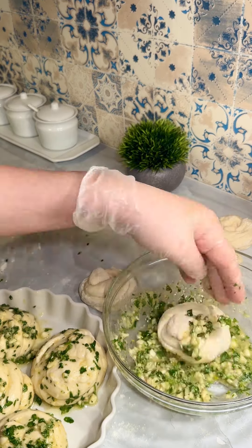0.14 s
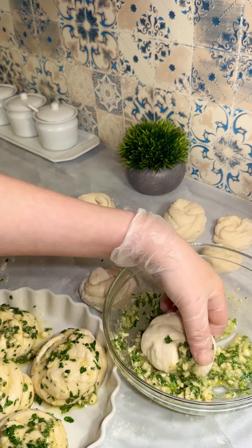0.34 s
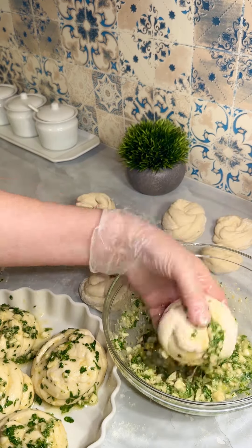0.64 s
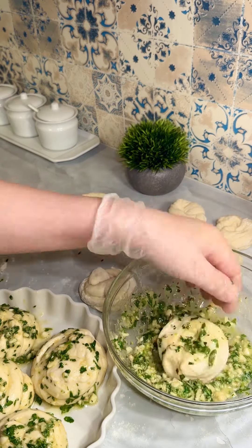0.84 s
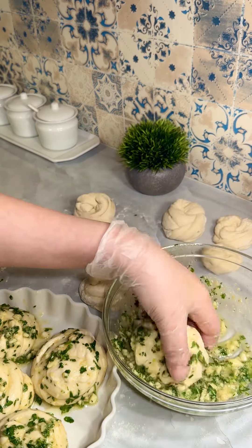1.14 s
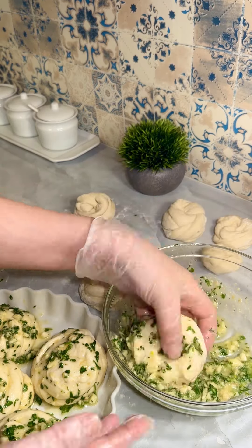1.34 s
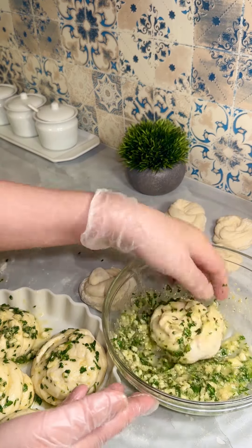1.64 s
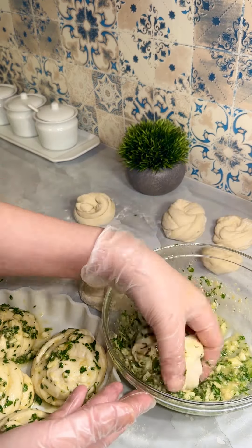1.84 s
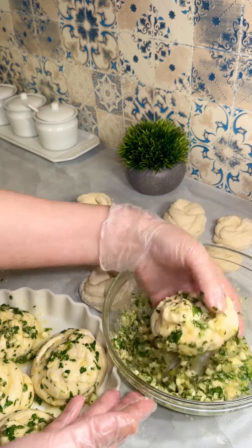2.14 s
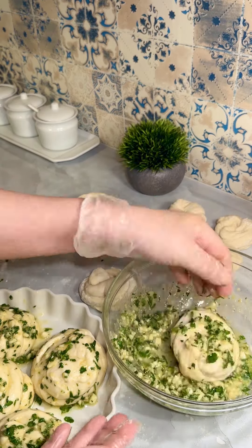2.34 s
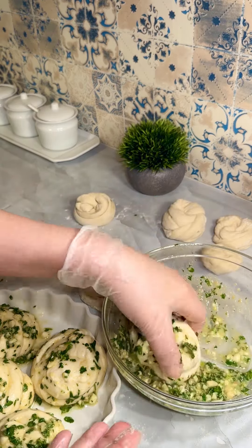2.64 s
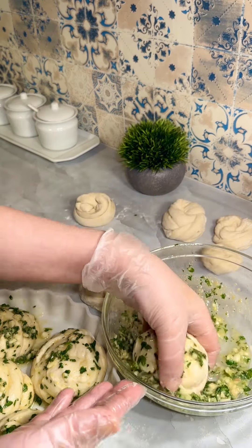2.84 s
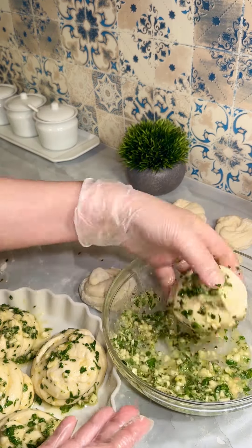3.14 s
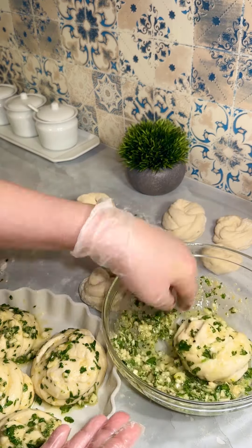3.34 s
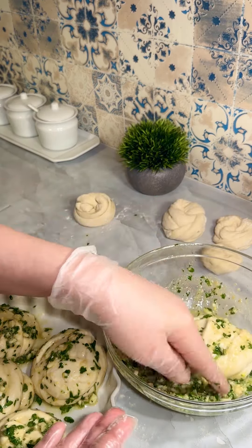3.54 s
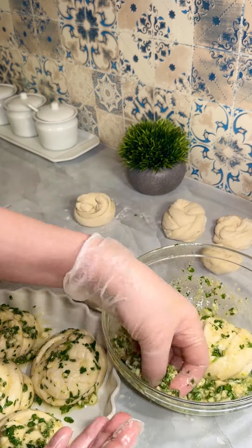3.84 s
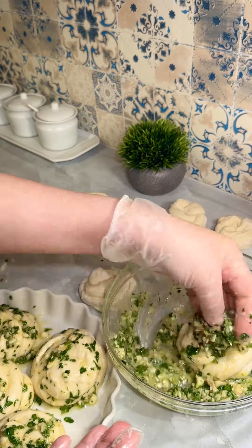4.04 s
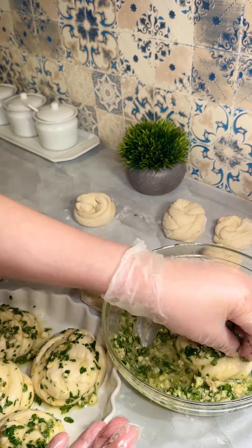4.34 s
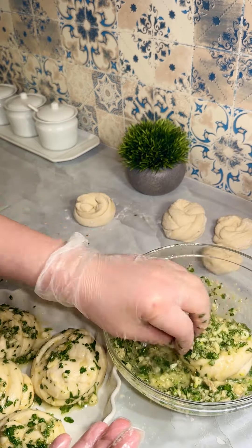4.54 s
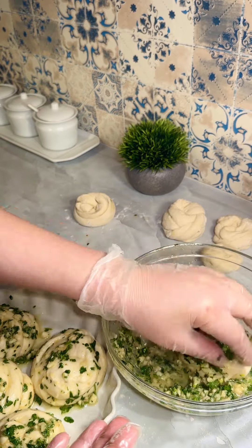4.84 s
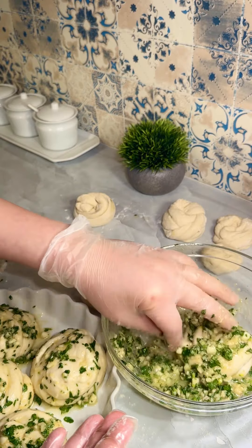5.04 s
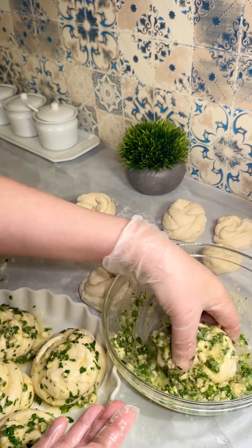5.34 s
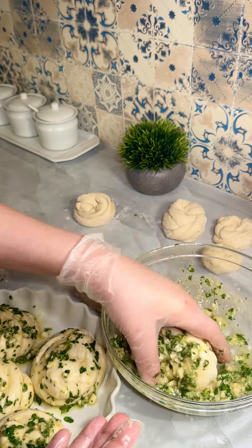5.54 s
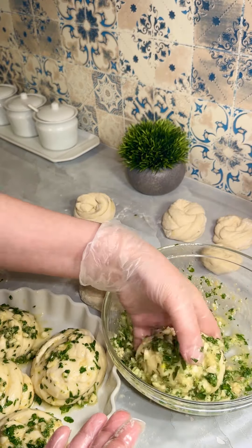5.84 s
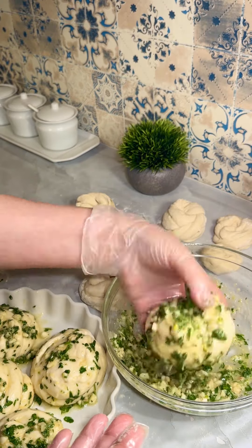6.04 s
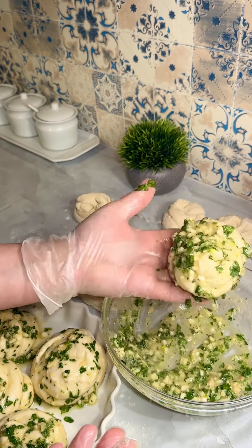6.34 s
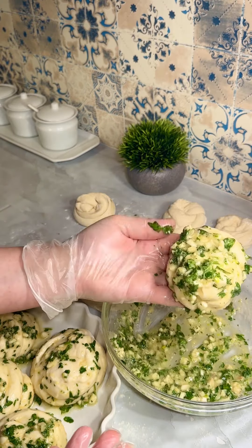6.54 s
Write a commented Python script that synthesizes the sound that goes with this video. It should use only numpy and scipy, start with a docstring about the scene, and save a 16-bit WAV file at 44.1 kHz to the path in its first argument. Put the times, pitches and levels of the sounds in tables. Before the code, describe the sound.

Dough squelches as a gloved hand turns it through chopped herbs and butter in a glass bowl, heard from close by in a kitchen with a low appliance hum. Soft thuds, small air pops, sticky smacks and two brief squirts come irregularly, while a faint far motor swells, later rises in pitch and fades. The hand eases off, presses out another strong plop and finishes with gentle rustling and oily clicks.

```python
"""A kitchen counter, microphone close to a glass bowl: a gloved hand kneads dough in oily herb butter.
From the start an appliance hums, herbs rustle, butter crackles and each push thuds the bowl dully.
Soon trapped air plops out and the dough leaves the glove with wet smacks; twice, air squirts through
a buttery gap. At two seconds a far motor swells, later climbing in pitch and fading. The hand eases
off, presses out one more strong plop at five seconds, and ends on light strokes and snaps of oil."""
import sys
import numpy as np
from scipy import signal
from scipy.fft import rfft, irfft, next_fast_len
from scipy.io import wavfile
from scipy.ndimage import uniform_filter1d, map_coordinates

SR = 44100
rng = np.random.default_rng(int(sys.argv[2]) if len(sys.argv) > 2 else 0)


def log_audio(samples):
    """Write samples as a 16-bit WAV file to the path given in sys.argv[1]."""
    # one column per channel
    frames = np.atleast_2d(samples).T
    # limit to full scale, then quantise
    limited = np.clip(frames, -1, 1)
    pcm = np.round(limited * 32767).astype(np.int16)
    wavfile.write(sys.argv[1], SR, pcm)


N = 295911
TIME = np.arange(N) / SR
CUTOFF_HZ = 16200

# The far motor. Each row: time in seconds, pitch in Hz, level in dB.
FAR_MOTOR = [(0, 42.9, -85), (2.0, 52, -75), (2.09, 58.53, -58.5), (3.45, 58.3, -58), (3.7, 52.8, -67.5),
             (3.95, 57.26, -59.5), (4.31, 58, -57.5), (4.39, 72.6, -73), (4.75, 80, -62.5), (4.92, 79, -86),
             (5.8, 75.7, -74), (6.71, 72.75, -74)]
# The appliance in the room. Each row: frequency in Hz, rms level in dB.
APPLIANCE_HUM = [(193.8, -60), (646, -84.5)]
# The kitchen's tail. Each row: frequency in Hz, seconds to fall by 60 dB.
KITCHEN_DECAY = [(200, 0.17), (700, 0.16), (2000, 0.15), (6000, 0.078), (12000, 0.029), (16000, .18)]
# Width of diffuse sound at the microphone. Each row: frequency in Hz, side against mid in dB.
STEREO_WIDTH = [(100, -19.5), (220, -12.5), (400, -8), (700, 2), (1300, 9.5), (2400, -1.5), (4400, -2.5),
                (8000, -10), (15000, -1)]
# The bowl sits a little to the left. Each row: frequency in Hz, left minus right in dB.
BOWL_BALANCE = [(200, 1.1), (700, 1), (1200, 5.5), (2500, -1), (5500, 4), (9000, 0), (13000, 1)]

# Tone of each noise at the microphone. Each row: frequency in Hz, relative gain in dB.
RUMBLE_SPECTRUM = [(30, -27), (70, -6.5), (105, 1.5), (140, 4.5), (210, 4.5), (260, -12), (400, -14.5),
                   (560, -14), (680, -19), (850, -26.5), (1500, -32.5), (4000, -39.5), (10000, -28),
                   (16000, -47.5)]
WHIRR_SPECTRUM = [(30, -26), (80, 0), (140, 2), (250, -10.5), (560, -20.5), (645, -12.5), (740, -54),
                  (2000, -48)]
RUSTLE_SPECTRUM = [(600, -24), (1500, -8.5), (2300, 0.5), (4000, 4.5), (6500, 2.5), (9000, -15),
                   (16000, -48)]
FIZZ_SPECTRUM = [(3000, -57.5), (6000, -7.5), (8000, 1), (11000, 5), (13000, -2), (16000, -12.5)]
SLIDE_SPECTRUM = [(30, -39), (100, -17.5), (350, 9.5), (700, 1.5), (1300, -10.5), (2000, -12.5),
                  (2600, -8.5), (3200, -9.5), (4000, -11.5), (6000, -39.5)]
SMEAR_SPECTRUM = [(30, -19), (70, 5.5), (170, 6.5), (400, 3.5), (800, -9.5), (1600, -15), (4000, -20),
                  (10000, -26.5), (16000, -36)]
SQUIRT_SPECTRUM = [(60, -30.5), (300, -2.5), (700, 1), (2000, -1.5), (3500, -3), (6000, -2), (9000, 4.5),
                   (14000, -0.5), (16000, -14)]
SMACK_SPECTRUM = [(60, -24), (250, -76), (450, 6.5), (900, 1), (1400, -8), (2400, 4.5), (3600, 0),
                  (6500, -0.5), (10000, 4), (13000, -2), (16000, -19.5)]

# The hand strokes through the chopped herbs.
# Each row: start and length in seconds, relative rustle level in dB, oily fizz against rustle in dB.
HAND_STROKES = [(0.053, .07, -69.5, 0), (0.233, 0.15, -63, 0), (0.447, .09, -70.5, -3),
                (0.558, 0.088, -68.5, 3), (0.732, 0.089, -72, 6), (0.977, 0.19, -70, -2.5),
                (1.181, 0.47, -71.5, 4), (1.665, .05, -64, 1), (1.727, .23, -70, -1.5),
                (2.016, 0.067, -68.5, 8.5), (2.203, 0.23, -72, 0), (2.478, 0.21, -74, 2),
                (2.769, 0.098, -68.5, 1), (2.906, 0.064, -73, -18), (3.136, 0.097, -74.5, 3),
                (3.326, 0.21, -74.5, 6), (3.581, 0.15, -76, 2.5), (3.813, .06, -74, -2),
                (4.033, 0.24, -81, 2), (4.421, 0.14, -79, 3), (4.623, .15, -83, 2), (4.98, 0.032, -74, 11),
                (5.152, 0.25, -73, -3.5), (5.412, 0.21, -71.5, 2.5), (5.683, 0.06, -73, 4),
                (5.843, 0.35, -76.5, -8), (6.502, 0.18, -77.5, 0)]
# Faint rustle between strokes. Each row: time in seconds, relative level in dB.
RUSTLE_FLOOR = [(0, -78), (1.95, -79), (2.15, -88), (3.8, -82), (4.3, -95), (6.71, -94)]
# Dough slides over the glass. Each row: start and length in seconds, relative level in dB.
DOUGH_SLIDES = [(.23, 0.23, -73.5), (.6, .07, -73), (.76, 0.031, -72), (1.0, 0.11, -65.5),
                (1.37, 0.1, -58.5), (1.8, 0.12, -72.5), (2.48, 0.084, -74), (3.06, 0.23, -69.5),
                (4.42, 0.31, -71), (5.87, 0.19, -71.5)]
# Resonances of the stretched glove. Each row: frequency and width in Hz, relative level in dB.
GLOVE_MODES = [(1510, 2100, 14.5), (3020, 320, -4), (4070, 50, 14.5), (6240, 230, 6.5), (7200, 330, 1),
               (8630, 440, 9), (9900, 490, -2.5), (11600, 250, -1)]
# The oily glove slips, long pushes smear the butter, sticky dough tears free.
# Each row: peak time in seconds, relative level in dB, swell and fade in seconds.
GLOVE_SLIPS = [(0.101, -62.5, 0.0078, 0.028), (2.216, -62.5, 0.0064, 0.034), (4.575, -71, 0.03, 0.033),
               (5.024, -61.5, 0.017, 0.018)]
BUTTER_SMEARS = [(.27, -63, 0.048, 0.015), (.35, -67, 0.042, 0.13), (.987, -52.5, 0.0011, .03),
                 (1.03, -45.5, 0.027, 0.034), (2.003, -57.5, 0.0014, 0.034), (4.012, -72, 0.0064, 0.021),
                 (4.055, -60, 0.021, 0.04), (5.98, -68, 0.13, 0.15)]
DOUGH_SMACKS = [(.7825, -39.5, 0.0012, 0.0031), (1.5575, -37.5, 0.00079, 0.0017),
                (1.5605, -28, 0.0027, 0.0017), (1.688, -51.5, 0.0045, .004),
                (2.2978, -29.5, 0.0022, 0.0031), (2.308, -58, 0.0024, 0.017),
                (3.2045, -40.5, 0.00055, 0.0036), (3.2135, -41, .001, 0.0031),
                (3.2185, -28, 0.00029, 0.0021)]
# The loudest oil films snap. Each row: start in seconds, relative level in dB, pitch in Hz.
OIL_SNAPS = [(0.257, -55, 6340), (0.347, -51.5, 3150), (.572, -42.5, 8750), (.623, -52.5, 3800),
             (.747, -56, 8000), (1.178, -50, 3070), (1.42, -45.5, 5800), (1.657, -41.5, 6260),
             (1.6854, -45, 7900), (1.7553, -48, 6400), (1.797, -49.5, 4200), (2.002, -44, 4360),
             (2.0714, -41.5, 4780), (2.412, -49, 11300), (2.628, -53.5, 11300), (2.774, -45, 6160),
             (2.866, -54, 4540), (4.16, -54.5, 8100), (4.202, -55.5, 5720), (4.222, -52.5, 5070),
             (4.368, -59, 9500), (4.502, -62, 13300), (4.849, -55, 12000), (5.2492, -50, 5460),
             (5.335, -49.5, 4970), (5.4798, -52.5, 7740), (5.5412, -48.5, 6320), (5.629, -50.5, 9500),
             (5.873, -52.5, 3900), (6.023, -51, 9400), (6.29, -43.5, 10760), (6.291, -50, 4650),
             (6.2963, -47, 3750)]
# Air hisses through a buttery gap.
# Each row: peak time in seconds, relative level in dB, pitch and nominal width in Hz.
AIR_SQUIRTS = [(1.442, -34, 12100, 1720), (2.001, -38, 11600, 1550)]
# Air pockets pop under the dough.
# Each row: start in seconds, relative level in dB, pitch in Hz, seconds to fall by 60 dB.
AIR_POCKETS = [(.655, -32.5, 675, 0.016), (.782, -43, 670, .02), (.922, -46.5, 570, 0.021),
               (1.39, -25.5, 595, 0.02), (1.401, -29.5, 616, 0.045), (1.442, -50.5, 674, 0.21),
               (1.559, -28.5, 880, 0.017), (1.92, -53, 512, 0.041), (2.297, -28, 695, 0.02),
               (2.524, -28.5, 654, 0.017), (3.2164, -20, 864, 0.0089), (5.029, -28.5, 835, 0.027),
               (5.0296, -41, 1475, 0.018), (5.031, -26, 602, 0.034), (5.59, -54, 590, 0.036)]
# The bowl's low modes. Each row: frequency in Hz, gain in dB, seconds to fall by 60 dB.
BOWL_MODES = [(121, -3.5, 0.12), (185.5, 4, 0.077)]
# Dough pushes the bowl against the counter. Each row: start in seconds, relative level in dB,
# extra gain of the upper mode in dB, relative level of the hollow under the dough in dB.
BOWL_PUSHES = [(0.249, -53, 11, -65), (.268, -36, -6, -69), (.299, -36, -1, -63), (.655, -46, 4, -44),
               (.788, -39.5, -2, -61), (.926, -28, 0.5, -44), (0.987, -42.5, 6, -48),
               (1.394, -34.5, 0.5, -32), (1.561, -32.5, -9.5, -40), (1.693, -29.5, -2, -48.5),
               (1.853, -46, 9.5, -51), (2.301, -26, -3, -55.5), (2.412, -42.5, -1.5, -61),
               (2.525, -40, -2, -45.5), (3.222, -33, 0, -48.5), (4.011, -45, -11, -54.5),
               (4.054, -44, -3, -52.5), (5.031, -36.5, 4, -28.5), (5.246, -49.5, 4, -62),
               (5.588, -48, -11, -57.5)]


def from_db(db):
    """Decibels to gain."""
    return 10 ** (np.asarray(db) / 20)


def rms_one(x):
    """Scale to unit power."""
    return x / np.sqrt(np.mean(x ** 2) + 1e-20)


def steady_power(x, size=260):
    """Even out a noise over `size` samples, so that its envelope alone sets the level."""
    return x / np.sqrt(uniform_filter1d(x ** 2, size) + 1e-12)


def in_time(rows):
    """One curve in time per column, joined by straight lines."""
    times, *columns = np.transpose(rows)
    return [np.interp(TIME, times, column) for column in columns]


def at_hz(points, hz):
    """Read a table on a log-frequency axis."""
    frequencies, values = np.transpose(points)
    return np.interp(np.log(np.maximum(hz, 1)), np.log(frequencies), values)


def colour(x, spectrum):
    """Filter by rows of frequency in Hz and gain in dB."""
    size = next_fast_len(x.shape[-1])
    gain = from_db(at_hz(spectrum, np.fft.rfftfreq(size, 1 / SR)))
    return irfft(rfft(x, size) * gain, size)[..., :x.shape[-1]]


def band_filter(x, order, hz, kind):
    """A low, high or band pass with a flat passband."""
    return signal.sosfilt(signal.butter(order, hz, kind, fs=SR, output="sos"), x)


def resonate(x, hz, width_hz):
    """A resonance with gain 1 at its peak."""
    radius = np.exp(-np.pi * width_hz / SR)
    angle = 2 * np.pi * min(hz, SR / 2) / SR
    feed = np.array([1, 0, -1]) * (1 - radius ** 2) / 2
    return signal.lfilter(feed, [1, -2 * radius * np.cos(angle), radius ** 2], x)


def drift(per_s):
    """A random wander of unit power that turns `per_s` times a second."""
    knots = rng.standard_normal(8192)
    return rms_one(map_coordinates(knots, [TIME * per_s], order=1, mode="wrap"))


def swell_and_fade(peak_s, swell_s, fade_s):
    """Rise to 1 at the peak, then die away."""
    exponent = np.maximum((peak_s - TIME) / swell_s, (TIME - peak_s) / fade_s)
    return np.exp(-np.minimum(exponent, 40))


def add(out, start_s, sound):
    """Mix a short sound in at its start."""
    at = max(round(start_s * SR), 0)
    out[at:at + len(sound)] += sound[:max(N - at, 0)]


def spread(mid, side):
    """Two unrelated signals become left and right, alike in the bass."""
    return mid + colour(side, STEREO_WIDTH) * np.array([[1], [-1]])


def room_tone(rumble_db=-65, waver_db=1.5, whine_ratio=2.48, whine_db=-10, whirr_db=-8):
    """A far motor whirrs and changes speed, an appliance hums, and the room rumbles all around."""
    motor_hz, motor_db = in_time(FAR_MOTOR)
    phase = 2 * np.pi * np.cumsum(motor_hz) / SR
    drone = np.sqrt(2) * (np.sin(phase) + from_db(whine_db) * np.sin(whine_ratio * phase))
    whirr = from_db(whirr_db) * rms_one(colour(rng.standard_normal(N), WHIRR_SPECTRUM))
    motor = from_db(motor_db + waver_db * drift(14)) * (drone + whirr)
    hum = sum(from_db(db + waver_db * drift(5)) * np.sqrt(2) * np.sin(2 * np.pi * hz * TIME)
              for hz, db in APPLIANCE_HUM)
    rumble = spread(*rms_one(colour(rng.standard_normal((2, N)), RUMBLE_SPECTRUM)))
    return motor + hum + from_db(rumble_db) * rumble


def kitchen_echoes(x, tail_db=-13, early_db=-11, early_s=0.024, gap_s=0.00057):
    """Quick echoes off bowl and tiles reach the microphone, then a short tail dies band by band."""
    t = TIME[:SR // 2]
    white, tail = rng.standard_normal((2, len(t))), 0
    edges_hz = np.geomspace(250, 16000, 7)
    for low, high in zip(edges_hz, edges_hz[1:]):
        t60 = at_hz(KITCHEN_DECAY, np.sqrt(low * high))
        tail += band_filter(white, 2, [low, high], "band") * from_db(-60 * t / t60)
    early = band_filter(rng.standard_normal((2, len(t))), 2, 500, "high") * np.exp(-t / early_s)
    echoes = from_db(tail_db) * rms_one(tail) + from_db(early_db) * rms_one(early)
    echoes *= (t > gap_s) / np.sqrt(len(t))
    return signal.fftconvolve(x[None], echoes, axes=1)[:, :N]


def inside_bowl(x, echo_db=-8, echo_s=0.022):
    """Quick reflections between glass and hand give friction a hollow, uneven colour."""
    t = TIME[:SR // 80]
    echoes = rms_one(rng.standard_normal(len(t)) * np.exp(-t / echo_s)) / np.sqrt(len(t))
    return x + from_db(echo_db) * signal.fftconvolve(x, echoes[None], axes=1)[:, :N]


def crackle(spectrum, per_s, clump_db, hiss_db):
    """Friction in the bowl: clumps of tiny clicks of uneven size over a smooth rubbing hiss."""
    clumps = from_db(clump_db * np.minimum(drift(45), 1.5))
    clicks = rng.random((2, N)) < per_s * clumps / SR
    sizes = np.minimum(rng.exponential(1, (2, N)), 4) * rng.choice([-1, 1], (2, N))
    grains = rms_one(clicks * sizes) + from_db(hiss_db) * rng.standard_normal((2, N))
    return spread(*rms_one(colour(inside_bowl(grains), spectrum)))


def stroke_envelope(rows, attack_s=0.0072, release_s=0.034, sag_db=3, settle_db=-7, settle_s=0.16):
    """Each stroke takes hold, eases off and lets go; the herbs spring back for a while after."""
    power = 0
    for start, length, db in rows:
        age = np.maximum(TIME - start, 0)
        after = np.maximum(age - length, 0)
        taking_hold = 1 - np.exp(-age / attack_s)
        easing = from_db(db - sag_db * np.minimum(age / length, 1))
        letting_go = np.exp(-np.minimum(after / release_s, 40))
        settling = from_db(settle_db) * np.exp(-after / settle_s)
        power += (taking_hold * easing * np.maximum(letting_go, settling)) ** 2
    return np.sqrt(power)


def rubbing(rustle_db=-2, fizz_db=-1.9, slide_db=3):
    """Herbs rustle, butter fizzes and dough slides on glass as the hand moves."""
    rustle = stroke_envelope([(start, length, db) for start, length, db, _ in HAND_STROKES])
    rustle = np.hypot(rustle, from_db(in_time(RUSTLE_FLOOR)[0]))
    fizz = stroke_envelope([(start, length, db + oily) for start, length, db, oily in HAND_STROKES])
    fizz = np.hypot(fizz, from_db(-79))   # the butter is never quite still
    slide = stroke_envelope(DOUGH_SLIDES, attack_s=0.02, release_s=0.026)
    return (rustle * from_db(rustle_db) * crackle(RUSTLE_SPECTRUM, per_s=550, clump_db=9.5, hiss_db=-6)
            + fizz * from_db(fizz_db) * crackle(FIZZ_SPECTRUM, per_s=890, clump_db=9.5, hiss_db=-1.5)
            + slide * from_db(slide_db) * crackle(SLIDE_SPECTRUM, per_s=1100, clump_db=0.5, hiss_db=3))


def squelch(x, shift_db=3.5):
    """Gaps in the herbs open and close, so that each band swells and sinks by itself."""
    log_centres = np.log(np.geomspace(1500, 16000, 8))
    size, out = next_fast_len(N), 0
    spectrum = rfft(x, size)
    log_hz = np.log(np.fft.rfftfreq(size, 1 / SR) + 1)
    for share in np.eye(len(log_centres)):
        band = irfft(spectrum * np.interp(log_hz, log_centres, share), size)[:, :N]
        out += band * from_db(shift_db * drift(35))
    return out * from_db(-shift_db / 4)


def glove_squeaks(gain_db=2.5):
    """Friction noise feeds a few resonances of the stretched glove as it slips."""
    envelope = sum(from_db(db) * swell_and_fade(at, swell, fade) for at, db, swell, fade in GLOVE_SLIPS)
    friction = rng.standard_normal(N)
    voice = sum(from_db(db) * rms_one(resonate(friction, hz, width)) for hz, width, db in GLOVE_MODES)
    return from_db(gain_db) * envelope * rms_one(voice)


def faint_snaps(per_stroke=3, above_stroke_db=9, spread_db=4, centre_hz=6210, spread_octaves=0.5):
    """Rows for the snaps that each stroke sheds at random moments, louder when the stroke is firm."""
    rows = [stroke for stroke in HAND_STROKES for _ in range(per_stroke)]
    moments = rng.random(len(rows))
    chance = np.clip(rng.standard_normal((len(rows), 2)), -2, 2)
    return [(start + when * length,
             db + above_stroke_db + spread_db * size,
             centre_hz * 2 ** (spread_octaves * pitch))
            for (start, length, db, _), when, (size, pitch) in zip(rows, moments, chance)]


def oil_snaps(fade_s=0.0012, width_ratio=0.84, ring_s=0.0031, ring_db=-13, scatter=0.15):
    """A snapping film gives a millisecond of noise, and the tiny cavities that it opens ring briefly."""
    out, t = np.zeros(N), TIME[:SR // 40]
    for start, db, hz in OIL_SNAPS + faint_snaps():
        noise = resonate(rng.standard_normal(len(t)), hz, width_ratio * hz)
        noise = resonate(noise, hz, 2 * width_ratio * hz)
        snap = steady_power(noise, size=90) * np.exp(-t / fade_s)
        cavity_hz = np.minimum(hz * np.exp(scatter * rng.standard_normal((3, 1))), CUTOFF_HZ)
        cavities = np.sin(2 * np.pi * cavity_hz * t).sum(axis=0) * np.exp(-t / ring_s)
        add(out, start, from_db(db) * (snap + from_db(ring_db) * cavities))
    return band_filter(out + 1e-18, 3, 1800, "high")


def ruptures(rows, spectrum, grain_db):
    """Clusters of tiny ruptures in butter or dough swell to a peak and fade."""
    envelope = sum(from_db(db) * swell_and_fade(at, swell, fade) for at, db, swell, fade in rows)
    grains = rng.standard_normal(N) * from_db(grain_db * np.clip(drift(1100), -1.5, 1.5))
    return envelope * steady_power(colour(grains, spectrum))


def air_squirts(swell_s=0.001, fade_s=0.008, splash_db=-7, burst_db=2, linger_db=-14, linger_s=0.032):
    """A narrow gap whistles high above a short broad splash, and hisses on as it empties."""
    splashes = [(at, db + splash_db, swell_s, 2 * fade_s) for at, db, _, _ in AIR_SQUIRTS]
    out = ruptures(splashes, SQUIRT_SPECTRUM, grain_db=-2)
    for at, db, hz, width in AIR_SQUIRTS:
        hiss = resonate(rng.standard_normal(N), hz, 2 * width)
        whistle = steady_power(resonate(hiss, hz, 2 * width))
        burst = from_db(burst_db) * swell_and_fade(at, swell_s, fade_s)
        emptying = from_db(linger_db) * swell_and_fade(at, swell_s, linger_s)
        out += from_db(db) * whistle * (burst + emptying)
    return out


def air_plops(opening_s=0.0032, sag=0.13, overtone_ratio=1.333, overtone_db=-17,
              splutter_db=-6, splutter_linger=1.43, hollow_hz=403.3, hollow_t60_s=0.045):
    """Air pockets and the hollow under the dough ring like small bottles, sinking amid a dull splutter."""
    out, t = np.zeros(N), TIME[:SR // 5]
    hollows = [(start, db, hollow_hz, hollow_t60_s) for start, _, _, db in BOWL_PUSHES]
    for start, db, hz, t60 in AIR_POCKETS + hollows:
        sinking_hz = hz * (1 + sag * (np.exp(-4 * t / t60) - 0.5))
        phase = 2 * np.pi * np.cumsum(sinking_hz) / SR
        ring = np.sin(phase) + from_db(overtone_db) * np.sin(overtone_ratio * phase)
        ring *= from_db(-60 * t / t60)
        noise = steady_power(resonate(rng.standard_normal(len(t)), hz, width_hz=0.26 * hz))
        splutter = band_filter(noise, 6, 2.52 * hz, "low")
        splutter *= from_db(splutter_db - 60 * t / (splutter_linger * t60))
        add(out, start, 2 * from_db(db) * (ring + splutter) * (1 - np.exp(-t / opening_s)))
    return out


def bowl_thuds(contact_s=0.016):
    """A soft, slow contact wakes only the two low modes of the loaded bowl, in opposite phase."""
    out, t = np.zeros(N), TIME[:SR // 3]
    contact = 1 - np.exp(-t / contact_s)
    for start, db, upper_db, _ in BOWL_PUSHES:
        for mode, (hz, mode_db, t60) in enumerate(BOWL_MODES):
            ring = np.sin(2 * np.pi * hz * t) * from_db(db + mode_db + mode * upper_db - 60 * t / t60)
            add(out, start, (-1) ** mode * 2 * ring * contact)
    return out


def scene(left_lag_samples=0.67, squirt_room_db=4):
    """The bowl is close to the microphone and a little louder on the left; the kitchen surrounds it."""
    squirts = air_squirts()
    wet = air_plops() + oil_snaps() + glove_squeaks()
    wet += ruptures(DOUGH_SMACKS, SMACK_SPECTRUM, grain_db=2.5)
    wet += ruptures(BUTTER_SMEARS, SMEAR_SPECTRUM, grain_db=1.5)
    near = band_filter(wet + squirts + bowl_thuds(), 3, 50, "high")   # small things radiate no deep bass
    delayed = map_coordinates(near, [np.arange(N) - left_lag_samples], order=3)
    left = colour(delayed, [(hz, db / 2) for hz, db in BOWL_BALANCE])
    right = colour(near, [(hz, -db / 2) for hz, db in BOWL_BALANCE])
    echoes = kitchen_echoes(wet + from_db(squirt_room_db) * squirts)
    return np.array([left, right]) + echoes + squelch(rubbing()) + room_tone()


def record(dry):
    """The highest treble is cut steeply."""
    return signal.sosfilt(signal.ellip(10, 0.1, 80, CUTOFF_HZ, fs=SR, output="sos"), dry)


dry = scene()
out = record(dry)
log_audio(out)
```